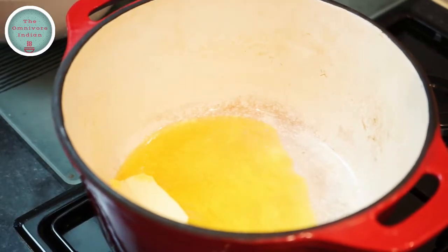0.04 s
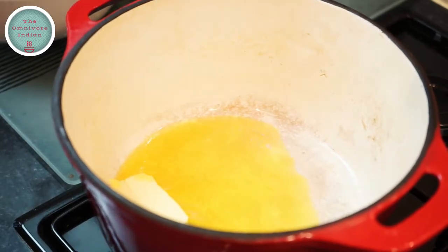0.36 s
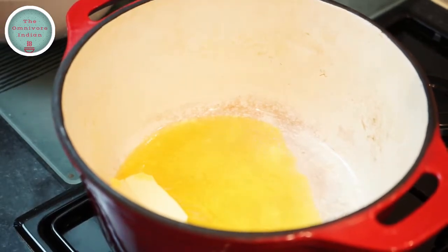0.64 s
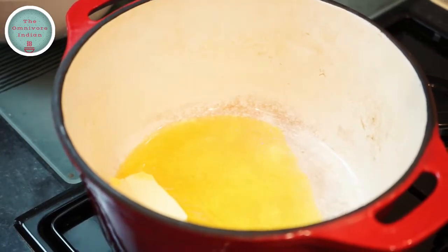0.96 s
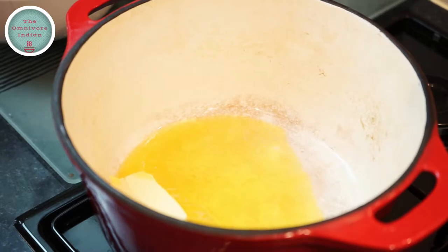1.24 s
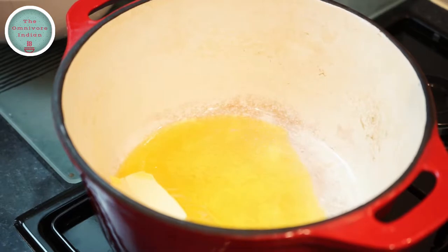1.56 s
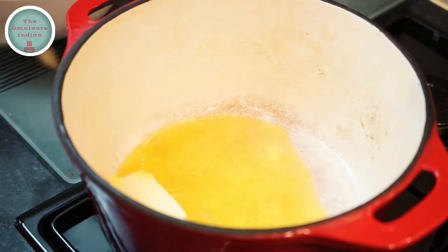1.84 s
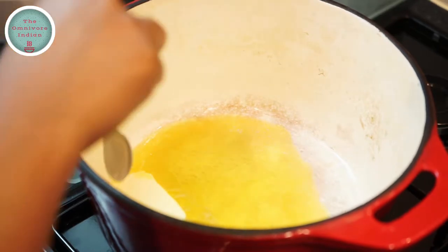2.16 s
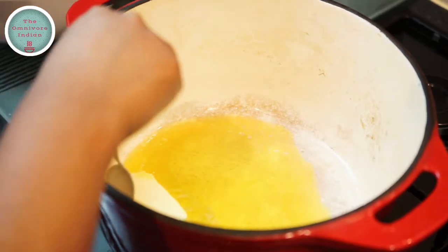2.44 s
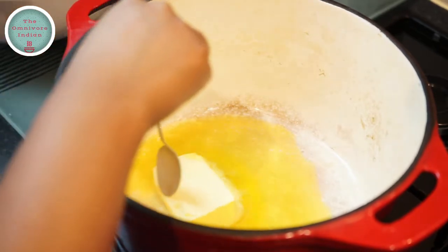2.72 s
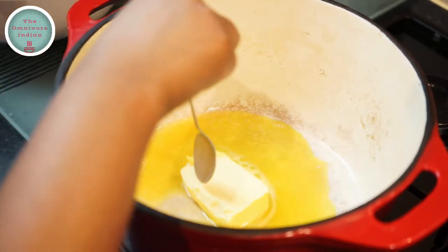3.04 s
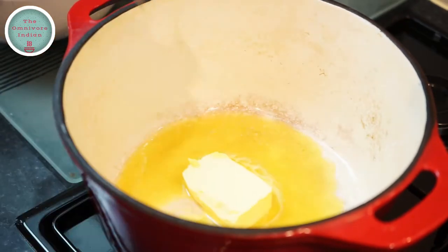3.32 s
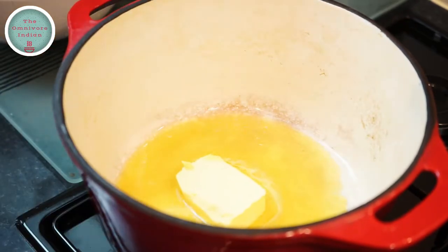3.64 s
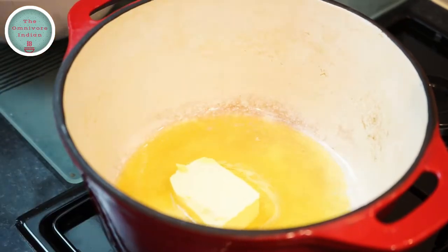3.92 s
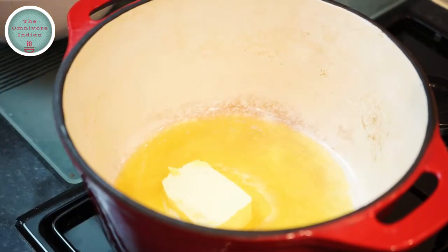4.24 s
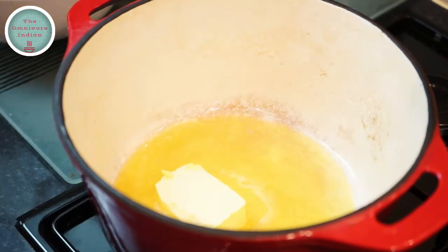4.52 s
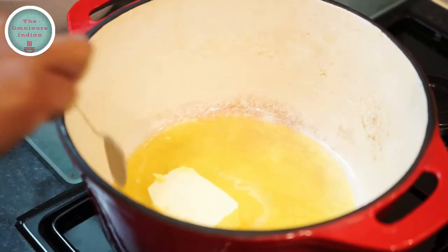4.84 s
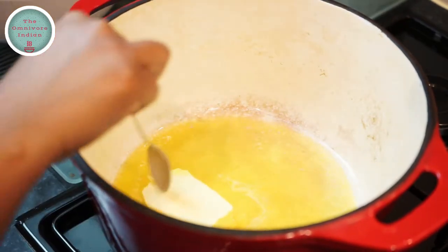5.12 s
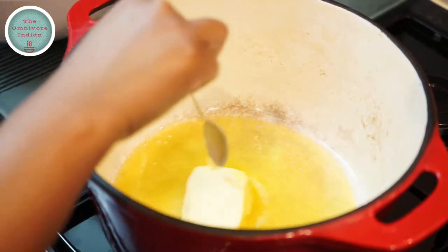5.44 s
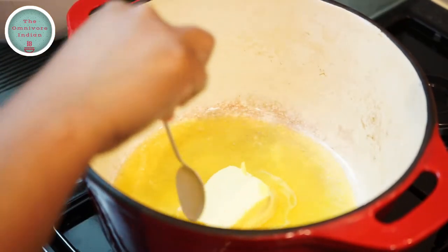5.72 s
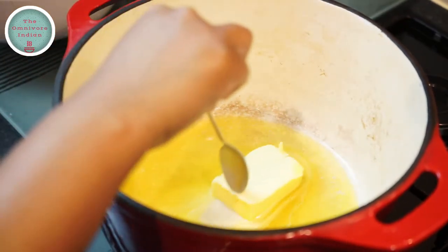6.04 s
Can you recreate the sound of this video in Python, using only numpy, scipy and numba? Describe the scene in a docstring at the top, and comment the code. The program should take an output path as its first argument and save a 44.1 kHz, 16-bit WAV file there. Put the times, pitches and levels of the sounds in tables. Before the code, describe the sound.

Close above an iron pot in a kitchen, butter and oil sizzle continuously over a faint low hum. Small pops, spits and sharp droplet ticks dot the fizz, each with a slight ring from the pot. There is one light, grazing knock near the start and a soft thump past the middle, around where the butter foams into a finer, higher sizzle with fewer large bubbles.

```python
"""A bright sizzle comes first: butter melting in hot oil, heard just above an enamelled iron pot.
Its water boils off in flurries of tiny bursting bubbles; larger ones pop, spit and chirp, and all
of them ring briefly in the pot. Pushed across the pot's hot floor, the butter foams up: the sizzle
grows finer and the large bubbles fade. Under it lie a low kitchen hum, one light grazing knock
early on and one soft thump about four seconds in."""
import sys
import numpy as np
from scipy import signal
from scipy.fft import rfft, irfft
from scipy.io import wavfile
from scipy.ndimage import uniform_filter1d, map_coordinates
from numba import njit

SR = 44100
rng = np.random.default_rng(int(sys.argv[2]) if len(sys.argv) > 2 else 0)


def generate_wav(sig):
    """Save sig (samples, or channels by samples) to the path in sys.argv[1] as 16-bit PCM at SR."""
    pcm = np.round(np.clip(np.atleast_2d(sig).T, -1, 1) * 32767).astype(np.int16)
    wavfile.write(sys.argv[1], SR, pcm)


N = 267907
T = np.arange(N) / SR
TOP_HZ = 15700
CRACK_S, TATTER_S = .0013, .005  # fade times: a bubble's skin cracks fast, then tatters for longer


def gain(db):
    """Turn decibels into a number to multiply by."""
    return 10 ** (np.asarray(db) / 20)


def unit(x):
    """Scale a sound to an average strength (rms) of 1."""
    return x / np.sqrt(np.mean(x ** 2))


def follow(table, column=1):
    """Join a table's points in time with straight lines, one value a sample."""
    columns = np.transpose(table)
    return np.interp(T, columns[0], columns[column])


def add(out, s, x, peak_db):
    """Mix in a short sound at s seconds, with its loudest millisecond or two at peak_db."""
    i = int(s * SR)
    peak = np.sqrt(uniform_filter1d(x ** 2, size=64).max())
    out[i:i + len(x)] += (x * gain(peak_db) / peak)[:N - i]


def colour(x, points):
    """Make some pitches louder and others softer, along a curve of (Hz, dB) points."""
    hz, db = np.transpose(points)
    f = np.maximum(np.fft.rfftfreq(len(x), 1 / SR), 1)
    return irfft(rfft(x) * gain(np.interp(np.log(f), np.log(hz), db)), len(x))


def resonate(x, hz, *widths_hz):
    """Keep the sound near one pitch, filtering once for each width; narrower rings longer."""
    for width in widths_hz:
        x = signal.lfilter(*signal.iirpeak(min(hz, TOP_HZ), hz / width, fs=SR), x)
    return x


def ring(x, notes):
    """A shaken object rings at several notes of its own."""
    return sum(gain(db) * resonate(x, hz, width) for hz, width, db in notes)


def burst(decay_s, size=6000):
    """A short puff of noise, equally strong at all pitches, that dies away."""
    puff = rng.standard_normal(size) * np.exp(-T[:size] / decay_s)
    even = irfft(np.exp(1j * np.angle(rfft(puff))), size)
    return even * np.exp(-T[:size] / (10 * decay_s))


def swell(x, rise_s=.0014):
    """Soften the start of a short sound."""
    return x * (1 - np.exp(-T[:len(x)] / rise_s))


def uneven(count, limit):
    """Random strengths: many small, a few large, none above the limit."""
    return np.minimum(rng.exponential(size=count), limit)


def scattered_puffs(count, decay_s, scatter_db, limit):
    """Puffs of noise that start at random moments and die away."""
    starts = np.zeros(N)
    starts[rng.integers(0, N, count)] = gain(scatter_db * uneven(count, limit))
    loudness = signal.lfilter([1], [1, -np.exp(-1 / (decay_s * SR))], starts)
    return rng.standard_normal(N) * loudness


@njit
def bubbles(start, hz, cycles, strength, glide):
    """Each bubble is a pure tone that swells quickly, dies away and slides in pitch as it opens."""
    out = np.zeros(N)
    for k in range(len(start)):
        length = int(cycles[k] * SR / hz[k]) + 2
        step = 2 * np.pi * hz[k] / SR
        turn = np.exp(-7 / length + 1j * step)  # moves the wave on one sample and fades it a little
        slide = np.exp(1j * step * glide[k] / length)
        wave = strength[k] / np.sqrt(length) + 0j
        for i in range(min(length, N - start[k])):
            wave *= turn
            turn *= slide
            out[start[k] + i] += wave.imag * min(1., 6 * i / length)
    return out


# How hard the fat boils: t/s, level/dB, fineness/dB (higher favours the tiniest bubbles)
BOILING = [(0.05, -42, -7), (0.3, -42, -7.5), (0.6, -42.5, -6), (0.75, -44, -7.5), (1.1, -43.5, -6.5),
           (1.45, -44.5, -6), (1.8, -45, -5), (2.25, -44, -6.5), (2.65, -43.5, -7), (2.84, -45.5, -5.5),
           (3.08, -45.5, -7), (3.28, -45.5, -7), (3.4, -44.5, -5.5), (3.75, -43.5, -7), (3.95, -43.5, -4.5),
           (4.1, -42, -3), (4.25, -43, -5.5), (4.5, -42, -4.5), (4.65, -44.5, -4.5), (5.0, -44.5, -4),
           (5.45, -44, -5), (5.7, -44.5, -3), (6.05, -45.5, -3.5)]
# The tone of the sizzle: f/Hz, level/dB
SIZZLE_TONE = [(1000, -30), (2000, -16.5), (2700, -17), (3100, -14.5), (3800, -8.5), (4300, -5),
               (5000, -4.5), (6200, -1.6), (7000, -5), (8300, -9), (10500, -10.5), (13000, -16),
               (15500, -27)]


def sizzle(scatter_db=2.0, flurries_per_s=150, middle_hz=5100, count=100000):
    """Thousands of tiny bubbles burst in flurries; finer foam shifts the sound upwards."""
    start = rng.integers(0, N, count)
    hz = rng.uniform(1000, 16000, count)
    # A random map over time and pitch makes bubbles of like size grow loud together.
    spot = [start / SR * flurries_per_s, np.log2(hz / 1000) * 2.14]
    flurry_db = map_coordinates(rng.standard_normal((4000, 64)), spot, order=1, mode="wrap")
    own_db = scatter_db * np.sqrt(hz / middle_hz) * uneven(count, 6.5)  # the tiniest vary most
    smallness = np.clip(np.log2(hz / middle_hz) * 2.8, -1, 1)
    foam_db = smallness * (follow(BOILING, column=2)[start] + 5)  # fineness -5 favours no size
    cycles = 10 * rng.uniform(.5, 2, count)
    glide = rng.normal(0, .042, count)
    fizz = bubbles(start, hz, cycles, gain(own_db + flurry_db + foam_db), glide)
    return unit(colour(fizz, SIZZLE_TONE)) * gain(follow(BOILING) - .12)


def snaps():
    """The thinnest bubble skins snap in pinprick clicks, 16 dB below the boiling level."""
    clicks = scattered_puffs(count=1100, decay_s=.00027, scatter_db=3.5, limit=3.5)
    treble = signal.butter(4, [3500, 13500], "band", fs=SR, output="sos")
    return unit(signal.sosfilt(treble, clicks)) * gain(follow(BOILING) - 16)


# How hard the larger bubbles simmer; they fade once the butter foams: t/s, level/dB
SIMMERING = [(0, -51), (0.45, -53.5), (0.6, -55.5), (1.0, -50.5), (1.1, -52.5), (1.3, -56), (1.4, -58),
             (1.9, -53.5), (2.35, -53), (2.6, -55), (3.05, -53), (3.2, -51), (3.4, -58), (3.7, -61),
             (4.2, -81), (4.55, -67), (4.65, -50), (4.8, -60), (5.3, -56), (6.0, -62)]


def simmer(first_hz=3170, last_hz=3450, scatter_db=2.0, count=4500):
    """Larger bubbles ring for a few milliseconds each; they slowly get smaller and higher."""
    start = rng.integers(0, N, count)
    hz = np.interp(start, [0, N], [first_hz, last_hz]) * np.exp(rng.normal(0, .08, count))
    strength = gain(scatter_db * uneven(count, 4))
    cycles = 28 * rng.uniform(.5, 2, count)
    glide = rng.normal(0, .04, count)
    return unit(bubbles(start, hz, cycles, strength, glide)) * gain(follow(SIMMERING) - 1.5)


# The tone of a pop, faint or loud: f/Hz, level/dB
POP_TONE = [(150, -38), (500, -3), (980, -8.5), (1160, 0.5), (1500, 0.5), (2300, 5), (2800, 4), (3400, 8),
            (4100, 5), (8000, -7.5), (15000, -33)]


def crackle(hollow_hz=1185, width_hz=130, start_db=-60, fade_db_per_s=.37):
    """Faint pops at random moments keep the pot's hollow note ringing."""
    puffs = scattered_puffs(count=700, decay_s=TATTER_S, scatter_db=1.5, limit=3)
    hollow = resonate(puffs, hollow_hz, width_hz)
    return unit(colour(puffs + hollow, POP_TONE)) * gain(start_db - fade_db_per_s * T)


# The notes at which the air in the pot rings: f/Hz, width/Hz, level/dB
POT_NOTES = [(1195, 80, 3.5), (1780, 60, -13), (2310, 45, -5), (2487, 30, -9), (2630, 70, -5),
             (3040, 45, -6), (3280, 80, -7), (3590, 60, -6), (4020, 70, -10), (4180, 45, -9),
             (4365, 50, -6), (4835, 35, -9), (5015, 70, -6), (5970, 80, -15)]


def pot(x, echo_db=-6, echo_s=.008, moves_per_s=40, pairs=3):
    """Sound bounces between the pot's hard walls and rings the air between them."""
    inside = x.copy()
    for _ in range(pairs):
        # Each spot on the pot floor has its own echo; the bursts wander between two spots.
        stops = rng.standard_normal(N // 20)
        place = np.pi * np.interp(T * moves_per_s, np.arange(len(stops)), stops)
        for share in (np.cos(place), np.sin(place)):
            walls = burst(echo_s)
            echo = signal.oaconvolve(x * share, walls)[:N]
            inside += gain(echo_db) * echo / np.sqrt(pairs * np.sum(walls ** 2))
    return inside + ring(inside, POT_NOTES)


# The tone of the room's low noise: f/Hz, level/dB
ROOM_TONE = [(20, -4), (50, -7), (90, -3), (135, 3.5), (175, -2.5), (240, 4.5), (370, 1), (430, -1.5),
             (560, 3), (720, -2), (850, -1), (1300, -38), (3000, -66)]
# Hollow notes that the room noise draws from the pot and hob: f/Hz, width/Hz, level/dB
HOLLOW_NOTES = [(113, 44, -73.5), (650, 17, -72.5), (913, 11, -76.5), (1132, 176, -67)]


def kitchen(air_db=-65, hum_hz=200, hum_db=-73):
    """Low room noise and the steady electric hum of an appliance."""
    air = gain(air_db) * unit(colour(rng.standard_normal(N), ROOM_TONE))
    hollow = sum(gain(db) * unit(resonate(rng.standard_normal(N), hz, width))
                 for hz, width, db in HOLLOW_NOTES)
    hum = gain(hum_db) * unit(np.sin(2 * np.pi * hum_hz * T))
    return air + hollow + hum


# The loudest steam pockets popping: t/s, puff level/dB (before POP_TONE shapes it), ring level/dB
STEAM_POPS = [(0.0204, -50, -53), (0.0328, -44, -64), (0.097, -36.5, -49), (0.2409, -42, -42.5),
              (0.2768, -35.5, -40), (0.3425, -42, -57), (0.4265, -50, -55), (0.6878, -41, -46),
              (0.9303, -42, -55), (1.2535, -45.5, -50), (1.303, -40.5, -55), (1.6243, -48, -49.5),
              (1.921, -45, -45), (1.981, -41.5, -49), (2.0005, -39.5, -43), (2.209, -43.5, -55),
              (2.2437, -43, -48), (3.09, -35.5, -53), (3.3378, -47, -50), (3.3917, -44, -57),
              (3.459, -36.5, -53), (3.5818, -44, -48), (3.6027, -38.5, -49), (3.7318, -39.5, -50),
              (3.8287, -50, -60), (3.8347, -43.5, -59), (3.8796, -40.5, -59), (3.9569, -47, -54),
              (3.9736, -39.5, -59), (4.3011, -44, -54), (4.3935, -42, -60), (4.4228, -41, -63),
              (4.7226, -43, -59), (5.0858, -46, -66), (5.1568, -37.5, -42), (5.2852, -40.5, -49),
              (5.411, -43, -48), (5.6675, -43.5, -61)]


def pops(ring_hz=3150, width_hz=1100):
    """A steam pocket swells open with a bright ring, and its skin tatters for a few milliseconds."""
    puffs, rings = np.zeros(N), np.zeros(N)
    for s, puff_db, ring_db in STEAM_POPS:
        puff = swell(burst(CRACK_S) + burst(TATTER_S))
        add(puffs, s, puff, puff_db)
        add(rings, s, resonate(puff, ring_hz, width_hz, width_hz), ring_db)
    return colour(puffs, POP_TONE) + rings


# The loudest spits, tight clusters of small bubbles: t/s, level/dB, f/Hz
STEAM_SPITS = [(0.055, -38, 5300), (0.4193, -39, 5490), (0.821, -46, 4990), (1.032, -37.5, 6130),
               (1.296, -41, 4600), (1.8507, -40.5, 5200), (1.9883, -47, 4000), (2.166, -38, 5540),
               (2.204, -39, 5000), (2.2714, -42, 6330), (2.3024, -40, 5000), (2.359, -44, 4400),
               (2.504, -40, 5600), (2.709, -39, 5800), (2.7294, -39, 5300), (2.924, -39, 5440),
               (2.968, -40.5, 5600), (3.134, -41.5, 3820), (3.281, -42, 6060), (3.8023, -36.5, 4630),
               (4.013, -39, 5600), (4.0495, -39, 5700), (4.1031, -43, 6500), (4.1686, -37, 6430),
               (4.205, -37.5, 5270), (4.265, -38, 5040), (4.4975, -44, 6700), (4.5311, -47, 5060),
               (4.724, -46, 4400), (5.0685, -39, 5870), (5.341, -36, 6330), (5.389, -41, 6800),
               (5.644, -38, 6690), (5.862, -40, 4240)]


def spits(width_hz=1400):
    """Water turns to steam all at once and spits brightly."""
    out = np.zeros(N)
    for s, db, hz in STEAM_SPITS:
        puff = swell(burst(decay_s=.0077))
        add(out, s, resonate(puff, hz, width_hz, 2 * width_hz), db)
    return out


# The loudest large bubbles opening: t/s, level/dB, f/Hz
BUBBLE_CHIRPS = [(0.0977, -44, 3260), (0.2418, -41, 3260), (0.477, -39, 3460), (0.484, -36.5, 2970),
                 (0.542, -41.5, 3010), (0.833, -44.5, 3600), (1.0248, -46, 3400), (1.045, -43, 3300),
                 (1.072, -40, 3400), (1.1087, -38.5, 3440), (1.12, -46, 3240), (1.1415, -43, 3400),
                 (1.15, -46, 3300), (1.166, -40.5, 3350), (1.182, -44, 3520), (1.207, -41.5, 2900),
                 (1.255, -43, 3280), (1.265, -44, 3330), (1.275, -42, 3270), (1.292, -41, 3350),
                 (1.299, -44.5, 3380), (1.4374, -48, 3360), (1.5294, -39.5, 3370), (1.6833, -42, 3180),
                 (1.914, -45, 3650), (1.981, -40, 3020), (2.2435, -43, 3200), (2.321, -38.5, 3130),
                 (2.369, -43.5, 3170), (2.4409, -40.5, 3400), (2.4906, -40, 2950), (2.6464, -40, 3300),
                 (2.689, -40.5, 2800), (2.7746, -38.5, 3300), (2.8714, -37.5, 3320), (3.084, -52, 3280),
                 (3.092, -44, 2810), (3.165, -43, 2910), (3.192, -45, 3060), (3.247, -43, 3240),
                 (3.2692, -41.5, 3400), (3.3385, -40, 3470), (3.408, -41, 3380), (3.5828, -44, 3500),
                 (3.607, -41, 3160), (3.9479, -44, 3490), (4.5461, -41, 3400), (4.6662, -42, 3560),
                 (5.0714, -45, 3570), (5.6161, -43, 3440)]


def chirps(cycles=42, snap_hz=5400, width_hz=3500):
    """The largest bubbles open with a bright snap and ring at their own pitch, sliding a little."""
    out, one = np.zeros(N), np.ones(1)
    for s, db, hz in BUBBLE_CHIRPS:
        glide = rng.normal(0, .088, 1)
        tone = bubbles(np.zeros(1, int), hz * one, cycles * one, one, glide)
        add(out, s, tone[:SR // 10], db)
        snap = resonate(burst(CRACK_S), snap_hz, width_hz, width_hz)
        add(out, s, snap, db - 6)
    return out


# Lone ticks of flying droplets: t/s, level/dB, f/Hz
DROPLET_TICKS = [(0.387, -34.5, 5330), (0.5754, -32, 5020), (1.282, -38, 10900), (2.5887, -42, 11000),
                 (3.3385, -37, 3930), (5.158, -39, 3600), (5.4476, -33, 5900), (5.639, -35, 6900),
                 (5.6467, -34.5, 6690), (6.0454, -35, 5440)]


def ticks(width_hz=3000):
    """Each thrown droplet makes one very short, sharp tick."""
    out = np.zeros(N)
    for s, db, hz in DROPLET_TICKS:
        add(out, s, resonate(burst(decay_s=.00041), hz, width_hz, width_hz), db)
    return out


# The notes of the knocked object: f/Hz, width/Hz, level/dB
KNOCK_NOTES = [(520, 30, -8), (580, 30, -4), (650, 35, -2), (735, 40, 0), (980, 90, -8), (1370, 25, 1),
               (2145, 22, 2), (2740, 22, 6)]
# The knock and its two bounces: t/s, level/dB
KNOCK_HITS = [(0.447, -40.5), (0.454, -45.5), (0.464, -44.5)]


def knock():
    """A light, grazing knock bounces, and each touch sets the object ringing."""
    out = np.zeros(N)
    for s, db in KNOCK_HITS:
        add(out, s, ring(burst(decay_s=.0029), KNOCK_NOTES), db)
    return out


# The low notes of the thump: f/Hz, width/Hz, level/dB
THUMP_NOTES = [(112, 58, 0), (310, 38, 4), (490, 96, -10)]


def thump(at_s=4.0905, contact_s=.00036):
    """One short, smooth push wakes low notes that die quickly: a soft thump."""
    out = np.zeros(N)
    push = T * np.exp(-T / contact_s)
    add(out, at_s, ring(push, THUMP_NOTES), peak_db=-44)
    return out


def scene():
    """The boiling fat gains the pot's echo and ring; knock, thump and kitchen join it in one channel."""
    fat = sizzle() + snaps() + simmer() + crackle() + pops() + chirps() + spits() + ticks()
    return (pot(fat) + knock() + thump() + kitchen())[None]


def record(dry):
    """Cut away the very highest treble, steeply above TOP_HZ."""
    return signal.sosfilt(signal.ellip(12, .2, 80, TOP_HZ, fs=SR, output="sos"), dry)


dry = scene()
out = record(dry)
generate_wav(out)
```